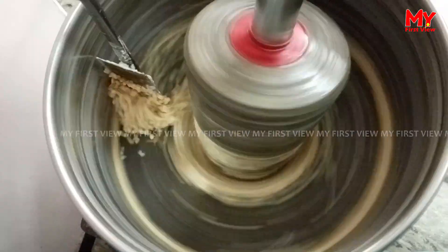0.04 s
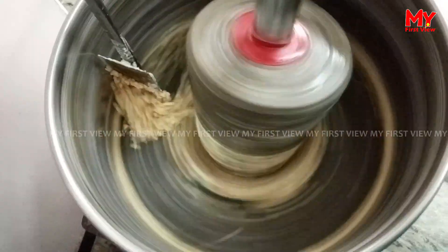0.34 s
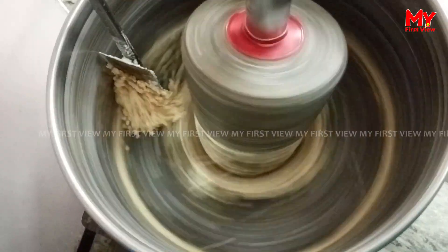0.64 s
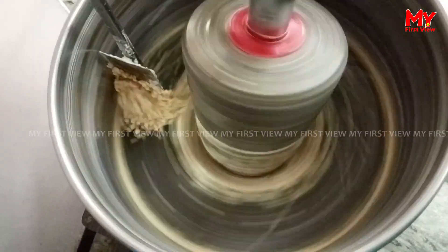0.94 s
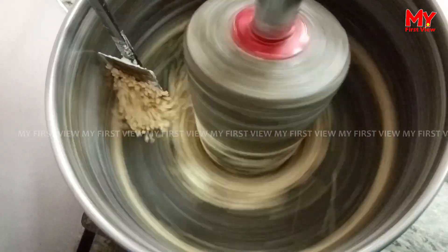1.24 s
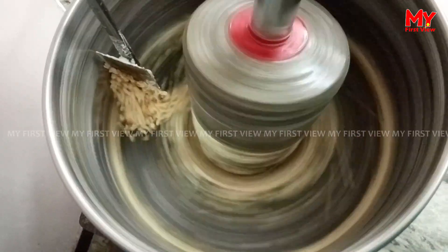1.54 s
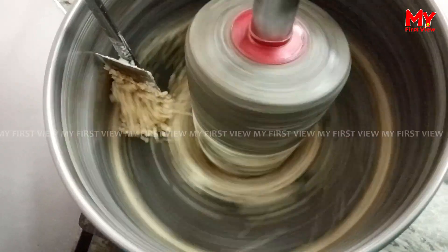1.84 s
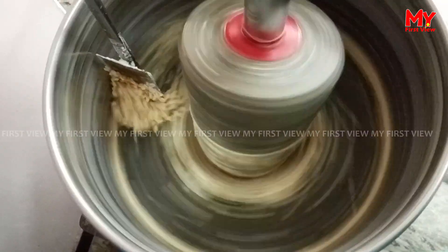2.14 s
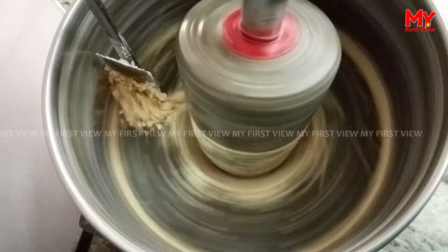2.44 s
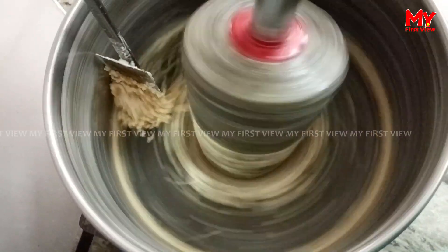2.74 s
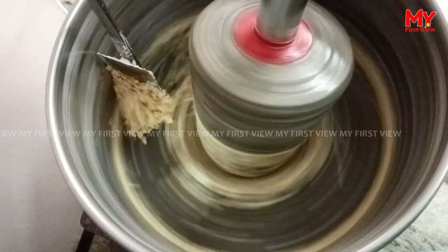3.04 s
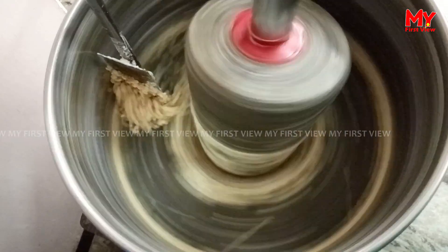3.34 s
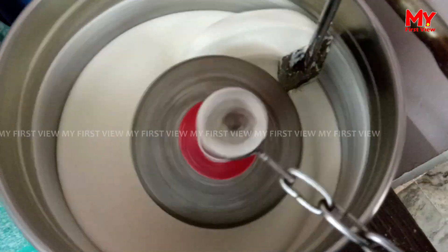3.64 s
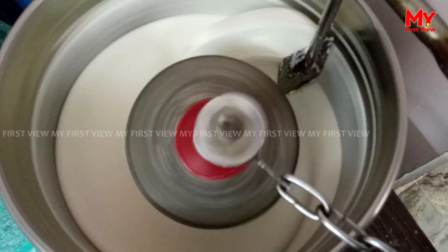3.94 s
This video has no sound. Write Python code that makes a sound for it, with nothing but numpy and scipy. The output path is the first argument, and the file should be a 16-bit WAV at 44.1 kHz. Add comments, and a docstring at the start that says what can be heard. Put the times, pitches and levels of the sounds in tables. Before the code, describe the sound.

A kitchen wet grinder drones and whines steadily, its steel drum ringing while grain hisses, crunches and cracks under the stone roller. The sound cuts out briefly, then returns as a duller, heavy rumble on smooth batter.

```python
"""The worn motor bearing of an electric wet grinder whines: tones near 800 Hz beat into a throbbing drone.
The motor turns a steel drum in which a stone roller crushes soaked grain, which hisses, crunches and
cracks. The rolling stone keeps drum and housing ringing, over faint mains hum.
After a sudden short silence a grinder fades in on smooth batter: duller, the roller rumbling heavily."""
import sys
import numpy as np
from scipy import signal
from scipy.fft import rfft, irfft
from scipy.io import wavfile

SR = 44100
rng = np.random.default_rng(int(sys.argv[2]) if len(sys.argv) > 2 else 0)


def store_pcm(level_fs):
    """Save levels as 16-bit WAV."""
    pcm = np.round(np.clip(level_fs, -1, 1) * 32767).astype(np.int16)
    wavfile.write(sys.argv[1], SR, np.atleast_2d(pcm).T)


N = 176400
T = np.arange(N) / SR

# drum and housing resonances: (centre [Hz], width [Hz], level on grain [dB], level on batter [dB])
BODY_MODES = [(115.4, 15.4, -44.5, -38), (172.7, 25.3, -32.5, -23.5), (240.3, 32.5, -42, -22),
              (287, 29, -56, -30.5), (491.6, 60, -40, -35), (613.6, 30, -36.5, -28.5),
              (699.4, 39, -31.5, -29), (756, 49, -31, -29.5), (813.3, 38, -24.5, -22),
              (847, 18.6, -34.5, -33), (936, 73, -35.5, -30), (1094, 30.5, -38, -48),
              (1425.4, 69, -37, -34.5), (1597, 22, -44, -46), (2230, 91, -39, -48), (2572, 110, -39, -32),
              (2734, 45, -41.5, -36.5), (3575, 150, -39, -61), (4730, 64, -41.5, -58),
              (6330, 870, -55, -43), (10020, 110, -62, -58)]
# housing boom on grain: (time [s], relative level [dB])
BOOM_LEVEL = [(0, -27), (.5, -30.5), (.78, -25), (.9, -31.5), (1.63, -33.5), (1.71, -25), (1.78, -35),
              (1.86, -30), (1.96, -33), (2.58, -30.5), (2.65, -28), (2.75, -31.5)]
# roller rumble on batter: (time [s], gain [dB])
RUMBLE_GAIN = [(3.6, -6), (3.625, 7), (3.66, 1), (3.72, 2), (3.78, 3.5), (3.82, -1.5), (3.88, 5.5),
               (3.94, -12), (3.98, -7), (4.0, 10.5)]
# stone rolling on stone: (frequency [Hz], relative density [dB])
ROLLING_SPECTRUM = [(25, -22), (42, -19), (76, 4.5), (88, -13), (270, -0.5), (400, 0.5), (600, -0.5),
                    (1000, -1), (1200, -10), (2000, -8), (5000, -42)]
# batter sliding under the roller: (frequency [Hz], relative density [dB])
BATTER_SPECTRUM = [(30, -22), (90, -6), (290, 6), (380, -1), (600, 2.5), (900, -10), (1200, -5.5),
                   (2000, -13), (3200, -13), (4200, -19), (5700, -20.5), (6600, -18), (7800, -34),
                   (11300, -37.5), (12500, -46), (15500, -54)]
# hard grains cracking: (time [s], peak [dB], pitch [Hz])
CRACK_EVENTS = [(0.8649, -18.5, 11800), (1.125, -22, 9000), (1.159, -23, 12000), (1.303, -25, 12500),
                (1.378, -14, 7200), (1.404, -9.5, 6000), (1.405, -24, 10500), (1.453, -31, 13000),
                (1.473, -27, 13000), (1.507, -11.5, 6000), (1.696, -23, 10500), (2.0325, -22, 11500),
                (2.347, -10, 6700), (2.7786, -16, 8700), (2.8255, -25, 10500), (3.0347, -23, 13000),
                (3.118, -22, 9000), (3.2955, -24, 9000), (3.362, -19, 9000), (3.398, -26, 10500)]
# clumps going under the roller: (time [s], length [s], relative level [dB])
CLUMPS = [(.19, .015, -30.5), (0.294, 0.011, -27), (0.648, 0.029, -29), (0.735, .015, -30.5),
          (0.969, 0.016, -28), (1.064, 0.017, -27.5), (1.09, 0.014, -27), (1.41, 0.013, -30),
          (1.462, 0.014, -28), (1.509, 0.016, -30), (1.842, 0.042, -31.5), (2.325, 0.013, -28.5),
          (2.354, 0.013, -29), (3.04, 0.011, -29), (3.068, 0.015, -30), (3.17, .025, -28),
          (3.5, 0.028, -30)]
# crumbling clumps: (frequency [Hz], relative density [dB])
CRUNCH_SPECTRUM = [(1500, -23), (4000, 10), (6500, 9), (8000, -2), (10500, 0), (13000, -4.5), (15700, -19)]
# grain load under the roller: (time [s], gain [dB])
LOAD_GAIN = [(0, -0.7), (.2, 1.4), (.4, 0.8), (.48, 0.1), (.6, .7), (.91, -0.5), (1.08, 0.5), (1.17, 0.5),
             (1.47, 0.5), (1.64, -1.5), (1.85, 0.8), (2.0, -0.5), (2.33, 0.6), (2.5, 0), (3.15, -0.1),
             (3.25, 0.2), (3.5, 0)]
# hiss of crushed grain: (frequency [Hz], relative density [dB])
GRIT_SPECTRUM = [(700, -18), (1300, 0.5), (1650, -1), (2000, -4), (2900, 1), (3700, 2), (4800, 1),
                 (5700, -2.5), (6700, -6.5), (7900, -18.5), (10500, -18.5), (13000, -29), (15700, -32)]
# bearing tones: (multiple of ball round [-], shaft sideband [-], level on grain [dB], on batter [dB])
BEARING_TONES = [(24, 0, -40, -34.5), (32, -1, -42, -32.5), (32, 0, -40, -34.5), (32, 1, -44, -31.5),
                 (40, 1, -37, -35), (48, -1, -28.5, -25), (48, 0, -27, -49), (48, 1, -32, -39),
                 (52, 1, -33, -48), (54, 0, -32, -44), (55, 0, -28.5, -26), (56, -2, -33.5, -44),
                 (56, -1, -21.5, -29), (56, 0, -20, -26), (56, 1, -30, -24), (57, 0, -33, -36),
                 (59, -2, -40.5, -46), (64.07, 0, -28, -42), (72.15, 0, -47.5, -35), (95.8, -1, -44.5, -36),
                 (95.35, 1, -42, -49)]
# bearing whine: (time [s], gain [dB])
WHINE_GAIN = [(0, 0.8), (.55, 0.5), (1.2, 0), (1.42, 0.5), (1.51, 2), (1.74, 0.7), (2.02, -0.5),
              (2.76, 1.2), (3.5, -0.8)]


def from_db(db):
    """Decibels to gain."""
    return 10 ** (np.asarray(db) / 20)


def unit_rms(x):
    """Scale to unit power."""
    return x / np.sqrt(np.mean(np.abs(x) ** 2) + 1e-20)


def envelope(points):
    """Gain over time from (time [s], level [dB]) points."""
    return from_db(np.interp(T, *np.transpose(points)))


def drift(corner_hz):
    """Slow random wander, unit spread."""
    hop, settle = 40, 2000
    pole = np.exp(-2 * np.pi * corner_hz * hop / SR)
    noise = rng.standard_normal(N // hop + settle + 2)
    slow = signal.lfilter([1], [1, -2 * pole, pole * pole], noise)[settle:]
    return np.interp(np.arange(N) / hop, np.arange(len(slow)), unit_rms(slow))


def coloured(x, spectrum):
    """Filter by a spectrum table; unit power."""
    hz, db = np.transpose(spectrum)
    bins_hz = np.maximum(np.fft.rfftfreq(N, 1 / SR), 1)
    gain = from_db(np.interp(np.log(bins_hz), np.log(hz), db))
    return unit_rms(irfft(rfft(x) * gain, N))


def resonate(x, hz, width_hz):
    """Steep-sided resonance, unit peak gain."""
    edges_hz = np.clip([hz - width_hz / 2, hz + width_hz / 2], 10, .45 * SR)
    return signal.sosfilt(signal.butter(2, edges_hz, "band", fs=SR, output="sos"), x)


def clicks(per_s, spread_db):
    """Random impulses of uneven size."""
    sizes = from_db(spread_db * np.minimum(rng.exponential(1, N), 5))
    return sizes * rng.choice([-1, 1], N) * (rng.random(N) < per_s / SR)


def snap(decay_s=.0011):
    """Noise burst of one breaking grain."""
    t = T[:SR // 50]
    return rng.standard_normal(len(t)) * np.exp(-t / decay_s)


def hum(motor_time_s, frame_hz=62, mains_hz=100):
    """Frame vibration follows motor speed; mains hum and its octave hold steady."""
    frame = from_db(-51) * np.sin(2 * np.pi * frame_hz * motor_time_s)
    mains = from_db(-48) * np.sin(2 * np.pi * mains_hz * T)
    octave = from_db(-44.5) * np.sin(2 * np.pi * 2 * mains_hz * T)
    return np.sqrt(2) * (frame + mains + octave)


def rolling_stone(level_db=-29.5):
    """Steady noise of stone rolling on stone."""
    return from_db(level_db) * coloured(rng.standard_normal(N), ROLLING_SPECTRUM)


def sliding_batter(level_db=-23):
    """Dull noise of smooth batter sliding under the roller."""
    return from_db(level_db) * coloured(rng.standard_normal(N), BATTER_SPECTRUM)


def cracks(width_hz=3200):
    """Single hard grains snap, each at its own pitch."""
    out = np.zeros(N)
    for time_s, peak_db, hz in CRACK_EVENTS:
        burst = resonate(snap(), hz, width_hz)
        start = int(time_s * SR)
        out[start:start + len(burst)] += from_db(peak_db) * burst / np.abs(burst).max()
    return out


def crunches(clump_gain_db=3, spatter_db=-42.5, swing_db=6.5, tick_db=-42.5):
    """Clumps crumble in bright bursts; in between, wet grain spatters and ticks."""
    bursts = sum(from_db(db + clump_gain_db) * np.exp(-2 * ((T - time_s) / length_s) ** 2)
                 for time_s, length_s, db in CLUMPS)
    spatter = envelope(LOAD_GAIN) * from_db(spatter_db + swing_db * drift(corner_hz=24.9))
    ticks = signal.fftconvolve(clicks(per_s=140, spread_db=1), snap())[:N]
    crumbs = coloured(clicks(per_s=5000, spread_db=3), CRUNCH_SPECTRUM)
    return np.hypot(bursts, spatter) * crumbs + from_db(tick_db) * coloured(ticks, CRUNCH_SPECTRUM)


def steel_drum(x, t60_s=.15, ring_db=-11):
    """The open drum adds a short, dense metallic ring to a sound inside it."""
    t = T[:SR // 5]
    tail = rng.standard_normal(len(t)) * from_db(-60 * t / t60_s)
    ring = signal.fftconvolve(x, tail / np.linalg.norm(tail))[:N]
    wet = from_db(ring_db)
    return (x + wet * ring) / np.hypot(1, wet)


def grit(level_db=-25, flutter_db=1.08):
    """Crushed grain: dense clicks merge into a hiss that swells with the load."""
    load = envelope(LOAD_GAIN) * from_db(flutter_db * drift(corner_hz=30.7))
    hiss = coloured(clicks(per_s=14000, spread_db=2.5), GRIT_SPECTRUM)
    return from_db(level_db) * load * hiss


def body_ring(boom_below_hz=200, rumble_below_hz=300):
    """The rolling stone keeps drum and housing ringing. Returns (on grain, on batter)."""
    on_grain, on_batter = 0, 0
    boom, rumble = unit_rms(envelope(BOOM_LEVEL)), envelope(RUMBLE_GAIN)
    for hz, width_hz, grain_db, batter_db in BODY_MODES:
        ring = unit_rms(resonate(rng.standard_normal(N), hz, width_hz))
        on_grain += from_db(grain_db) * ring * (boom if hz < boom_below_hz else 1)
        on_batter += from_db(batter_db) * ring * (rumble if hz < rumble_below_hz else 1)
    return on_grain, on_batter


def bearing_whine(motor_time_s, ball_round_hz=14.75, shaft_hz=24.3, drum_hz=2.25, shake_hz=12):
    """Balls pass a flaw; drum turns sway the tones, the roller shakes them. Returns (grain, batter)."""
    sway_depth, shake_depth = .17, .13
    drum_turns = [np.exp(2j * np.pi * drum_hz * k * motor_time_s) for k in (-2, -1, 1, 2)]
    gain = np.sqrt(2) * envelope(WHINE_GAIN)
    start_cycles = rng.random(100)
    on_grain, on_batter = 0, 0
    for multiple, sideband, grain_db, batter_db in BEARING_TONES:
        sway = unit_rms(sum(turn * np.exp(2j * np.pi * rng.random()) for turn in drum_turns))
        shake = unit_rms(drift(shake_hz) + 1j * drift(shake_hz))
        hz = round(multiple) * ball_round_hz + sideband * shaft_hz
        # sideband phase offset: the shaft bends both pitch and level
        offset_cycles = start_cycles[round(multiple)] + sideband ** 2 / 6
        carrier = np.exp(2j * np.pi * (hz * motor_time_s + offset_cycles))
        tone = gain * (carrier * (1 + sway_depth * sway + shake_depth * shake)).real
        on_grain += from_db(grain_db) * tone
        on_batter += from_db(batter_db) * tone
    return on_grain, on_batter


def scene(stop_s=3.532, restart_s=3.574, fade_s=.31, fade_start_db=-24.5):
    """Grinding grain, a short silence, then grinding batter."""
    motor_speed = 1 + .0004 * drift(corner_hz=1.76)
    motor_time_s = np.cumsum(motor_speed) / SR
    motor_hum = hum(motor_time_s)
    grain_whine, batter_whine = bearing_whine(motor_time_s)
    grain_ring, batter_ring = body_ring()
    grinding = steel_drum(grit()) + rolling_stone() + crunches() + cracks()
    grain = motor_hum + grinding + grain_ring + grain_whine
    batter = motor_hum + sliding_batter() + batter_ring + batter_whine
    fade_in = (T > restart_s) * np.clip(from_db(fade_start_db) + (T - restart_s) / fade_s, 0, 1)
    return (grain * (T < stop_s) + batter * fade_in)[None]


def record(dry, cutoff_hz=15800):
    """Steep low-pass."""
    return signal.sosfilt(signal.ellip(12, .1, 90, cutoff_hz, fs=SR, output="sos"), dry)


dry = scene()
out = record(dry)
store_pcm(out)
```